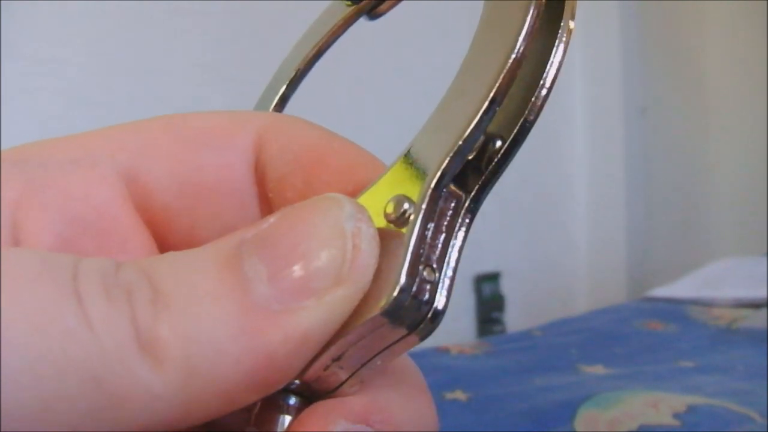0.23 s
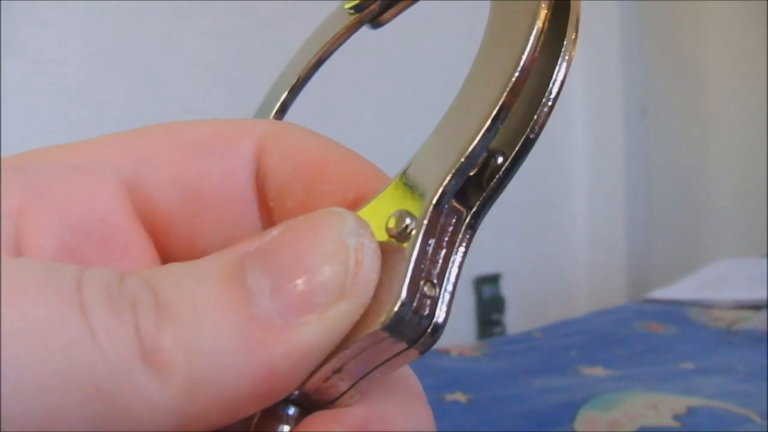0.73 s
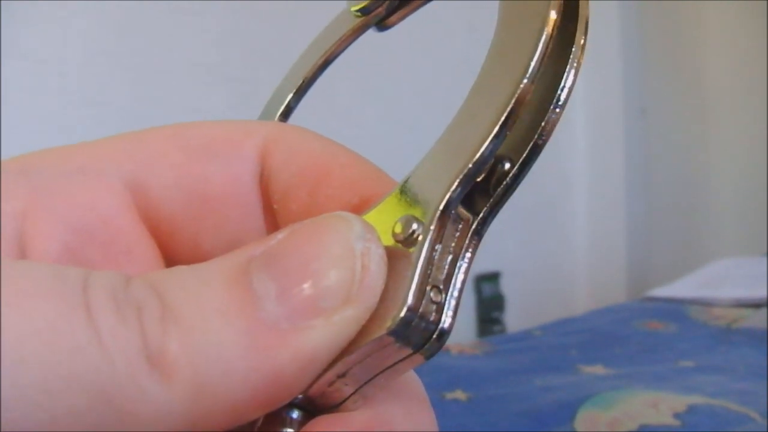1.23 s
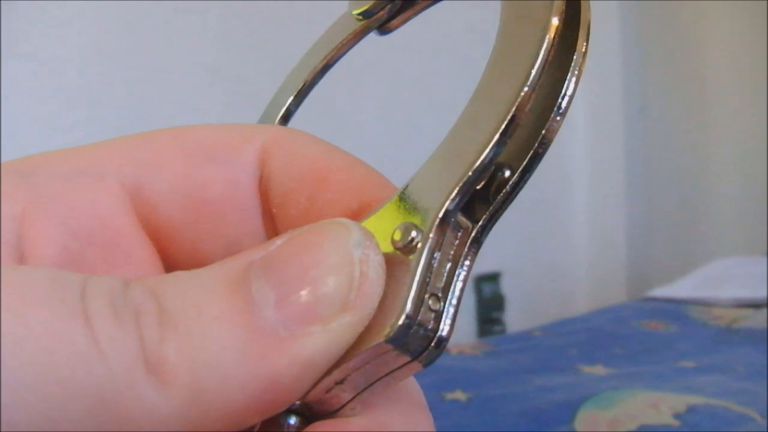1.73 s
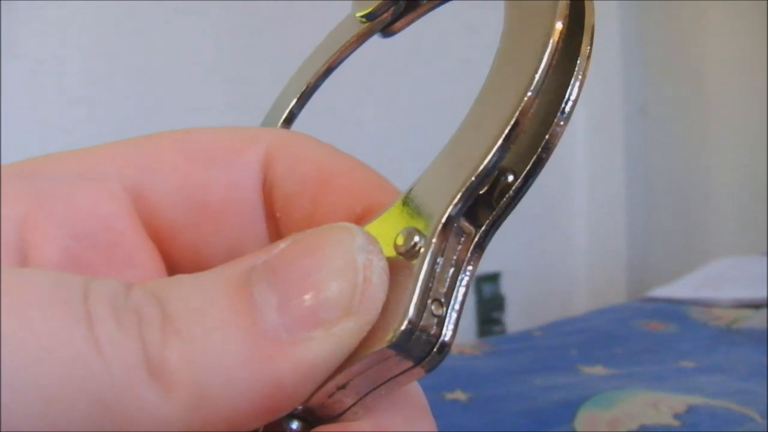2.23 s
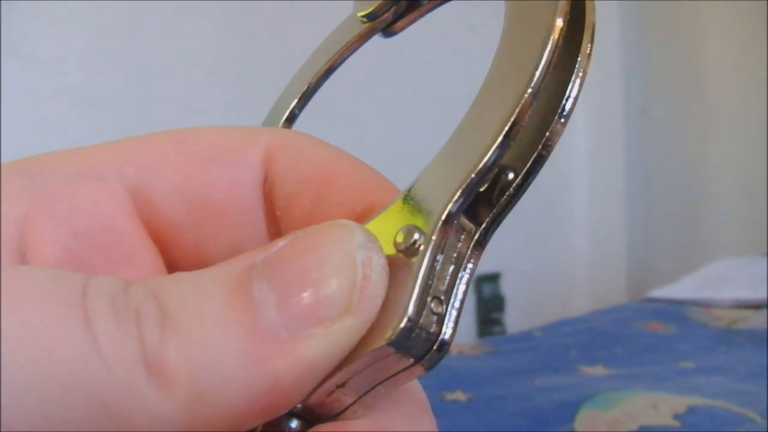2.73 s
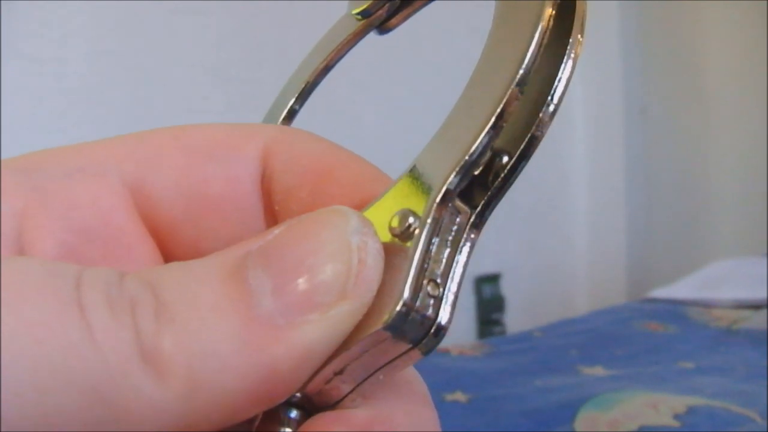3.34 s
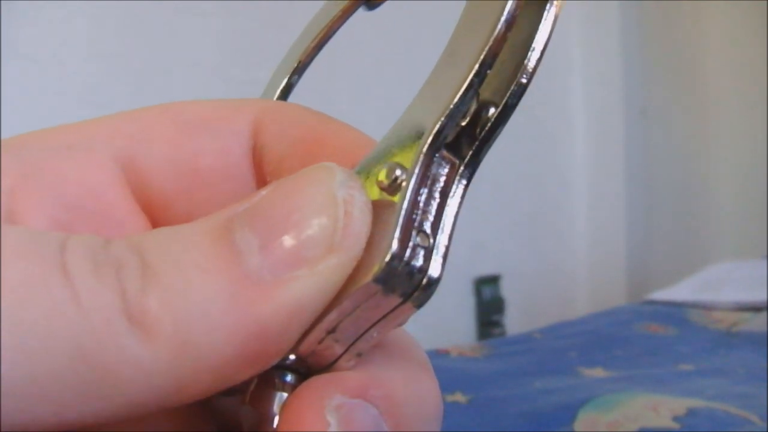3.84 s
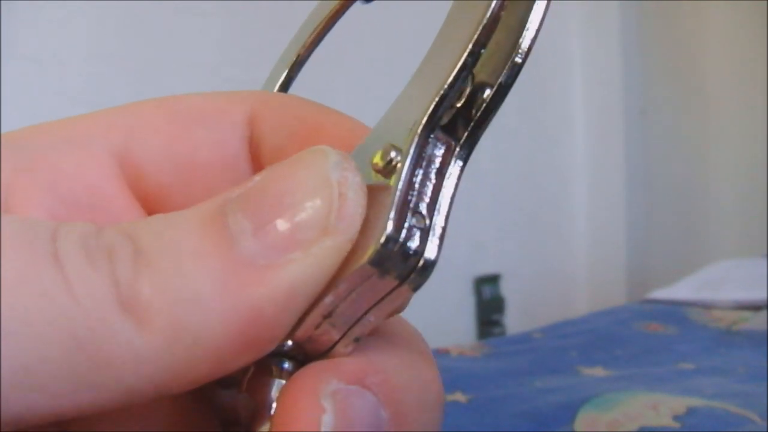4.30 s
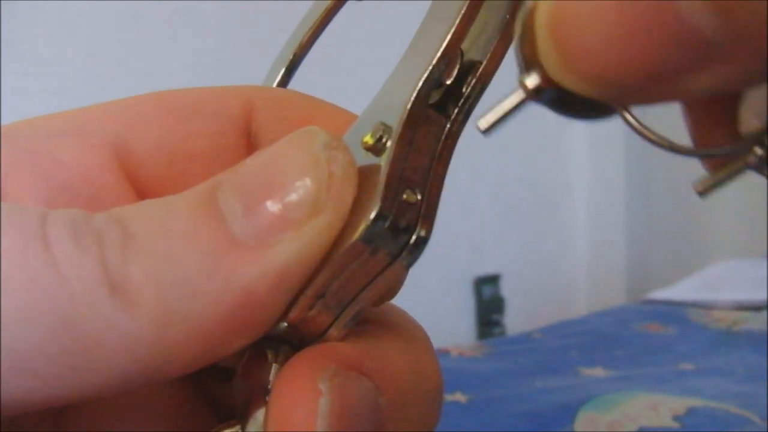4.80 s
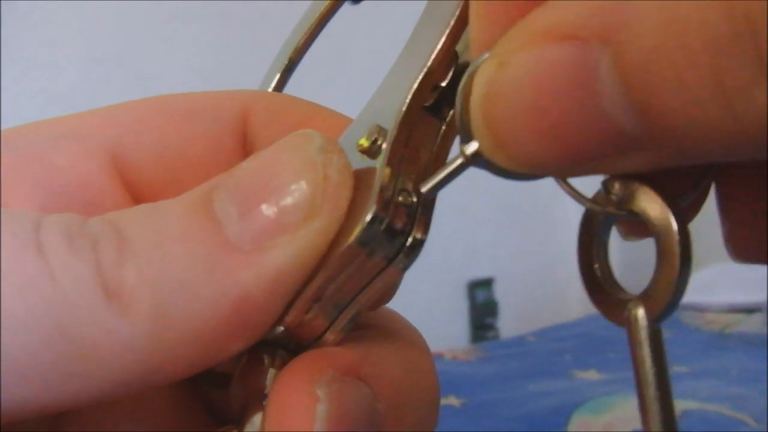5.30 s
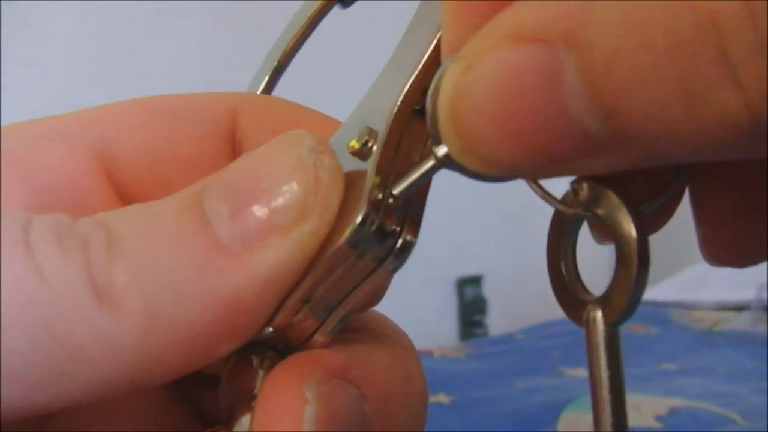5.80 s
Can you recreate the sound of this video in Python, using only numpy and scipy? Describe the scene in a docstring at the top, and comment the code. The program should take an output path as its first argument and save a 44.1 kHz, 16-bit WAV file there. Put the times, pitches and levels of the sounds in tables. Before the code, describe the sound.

Faint, high metallic clinks of keys on a ring and soft handling, followed by a dull knock and light taps on a handcuff lock.

```python
"""A quiet furnished room, a stereo microphone close to the hands, over low rumble and hiss.
A small key on a key ring is picked up and brought to a steel handcuff. Keys and ring clink with two
high tones until a finger or other metal damps them, and scrape on each other between clinks.
The hands bump and rub, skin squeaks once on the steel, and the key knocks on the tightly held lock,
then taps lightly as it feels for the keyhole."""
import sys
import numpy as np
from scipy import signal
from scipy.fft import rfft, irfft
from scipy.io import wavfile
from scipy.ndimage import uniform_filter1d

SR = 44100
rng = np.random.default_rng(int(sys.argv[2]) if len(sys.argv) > 2 else 0)


def digitize_waveform(pressure):
    """Quantize a signal to 16-bit integers and store it at the path in sys.argv[1].

    Rows of a 2-D input are taken as channels; values are limited to [-1, 1].
    """
    field = np.atleast_2d(pressure).T
    bounded = np.clip(field, -1, 1)
    quanta = np.round(bounded * 32767).astype(np.int16)
    wavfile.write(sys.argv[1], SR, quanta)


N = 266893
TIME = np.arange(N) / SR
HZ = np.fft.rfftfreq(N, 1 / SR)

# Keys sliding on the ring. Each row: start and end in seconds, relative level in dB.
KEY_SCRAPES = [(0.517, 0.556, -73), (0.763, 0.96, -57.5), (1.38, 1.446, -57), (1.48, 1.6, -64),
               (2.009, 2.071, -66.5), (2.168, 2.257, -65.5), (2.295, 2.375, -61), (2.39, 2.55, -72),
               (2.734, 2.833, -71), (3.202, 3.31, -74.5), (3.411, 3.567, -67.5), (3.615, 3.85, -71),
               (3.919, 4.113, -67), (5.063, 5.108, -66)]


def amp(db):
    """Decibels to gain."""
    return 10 ** (np.asarray(db) / 20)


def unit_rms(x):
    """Scales to rms 1."""
    return x / np.sqrt(np.mean(x ** 2) + 1e-20)


def curve_at(points, hz):
    """Reads a curve on a log-frequency axis."""
    point_hz, value = np.transpose(points)
    return np.interp(np.log(hz + 1), np.log(point_hz + 1), value)


def filtered(x, response):
    """Applies a frequency response."""
    return irfft(rfft(x) * response, N)


def coloured(clicks, spectrum):
    """Gives clicks a spectrum with minimum phase, so nothing sounds before the blow."""
    log_gain = np.log(amp(curve_at(spectrum, abs(np.fft.fftfreq(2048, 1 / SR)))))
    impulse = np.fft.ifft(np.exp(np.conj(signal.hilbert(log_gain)))).real[:512]
    return signal.oaconvolve(clicks, impulse)[:N]


def resonances(peaks):
    """Frequency response of a body: the direct sound plus its resonances."""
    return 1 + sum(amp(db) / (1 + 2j * (HZ - hz) / width) for hz, width, db in peaks)


def add(mix, start_s, sound):
    """Mixes a sound in at a time."""
    part = mix[max(round(start_s * SR), 0):][:len(sound)]
    part += sound[:len(part)]


def swells(rubs, ends_db=-13):
    """Gain over time of rubs that each swell and fade, their ends weaker than their middle."""
    return sum(amp(db + ends_db * (2 * (TIME - middle) / length) ** 2) for middle, length, db in rubs)


def room_tone(left_db=-53, right_db=-54.1, whine_hz=10900, whine_db=-80):
    """Room rumble and microphone hiss, with a thin electronic whine."""
    # Rumble falling away into hiss. Each row: frequency in Hz, relative density in dB.
    spectrum = [(12, -43), (20, 1), (53, 0.5), (86, -1), (158, -2.5), (234, -5), (270, -5.5), (357, -7.5),
                (1030, -14), (1150, -15), (2260, -19), (5530, -24), (7730, -27), (10500, -30),
                (16000, -36.5)]
    # How alike the two channels are. Each row: frequency in Hz, coherence from 0 to 1.
    likeness = [(30, 0.56), (130, 0.43), (600, 0.28), (3000, 0.35), (15000, 0.1)]
    left, independent = rfft(rng.standard_normal((2, N)))
    coherence = np.clip(curve_at(likeness, HZ), 0, 1)
    right = coherence * left + np.sqrt(1 - coherence ** 2) * independent
    noise = unit_rms(irfft(np.array([left, right]) * amp(curve_at(spectrum, HZ)), N))
    whine = np.sqrt(2) * amp(whine_db) * np.sin(2 * np.pi * whine_hz * TIME)
    return noise * amp([[left_db], [right_db]]) + whine


def slips(grains_per_s=600, spread_db=2.2, clump_db=4, ripple_db=3, port_db=3):
    """Metal slips on metal in clumps of tiny grains, at four contacts with a colour each."""
    spectrum = np.zeros((2, len(HZ)), complex)
    knots_hz = np.linspace(0, SR / 2, num=32)
    for _ in range(4):
        sizes = amp(spread_db * np.minimum(rng.exponential(1, N), 3)) * rng.standard_normal(N)
        drift = unit_rms(uniform_filter1d(rng.standard_normal(N), size=300))
        clumps = amp(clump_db * np.clip(drift, -2, 2))
        grains = sizes * clumps * (rng.random(N) < grains_per_s / SR)
        colour_db = ripple_db * rng.uniform(-2, 2, len(knots_hz))
        # short waves are shaded differently on their way to each microphone port
        shade_db = port_db * rng.uniform(-2, 2, (2, len(knots_hz)))
        spectrum += rfft(grains) * amp([np.interp(HZ, knots_hz, colour_db + side) for side in shade_db])
    return unit_rms(irfft(spectrum, N))


def scrapes(gain_db=3, body_db=-1, body_below_hz=9800, sag_db=4.5, fade_s=0.014):
    """Slips excite the keys along the ring: a high fizz over a lower body, sagging as force is lost."""
    # Colour of sliding metal. Each row: frequency in Hz, relative density in dB.
    colour = [(500, -20), (1500, -17.5), (2300, 3.5), (4000, 2), (5600, -2.5), (6700, 12.5), (8300, 12.5),
              (9500, 5), (11500, 4), (14000, 7.5), (15600, 7), (16300, -11)]
    # Key resonances that a scrape keeps alive. Each row: centre and width in Hz, gain in dB.
    key_peaks = [(7720, 170, 5.5), (10700, 99, 12.5)]
    start, end, db = np.transpose(KEY_SCRAPES)[:, :, None]
    t = TIME[::64]
    progress = np.clip((t - start) / (end - start), 0, 1)
    fades = np.clip(np.minimum(t - start, end - t) / fade_s + .5, 0, 1)
    strokes = amp(db - sag_db * progress) * fades
    force = np.interp(TIME, t, strokes.sum(0))
    body = 1 / (1 + (HZ / body_below_hz) ** 12)
    shelf = 1 - body + amp(body_db) * body
    response = shelf * amp(curve_at(colour, HZ)) * resonances(key_peaks)
    return amp(gain_db) * filtered(force * slips(), response)


def touches(per_s=16, at_most=12, spread_db=3, free_s=0.023, balance_spread_db=8):
    """Rows of faint clinks that come by chance while the keys slide, following each scrape's level."""
    over_scrape_db = np.array([4.5, -1.5, 4, 4])  # bright tick, dull tick, high tone, low tone
    rows = []
    for start, end, db in KEY_SCRAPES:
        times = start + (np.arange(at_most) + rng.random(at_most)) / per_s
        levels = db + over_scrape_db + spread_db * rng.standard_normal((at_most, 4))
        sides = balance_spread_db * rng.standard_normal(at_most)
        rows += [(s, *level, free_s, side) for s, level, side in zip(times, levels, sides) if s < end]
    return rows


def contact_force(t, chatter_s=0.0056, chatter_db=-1, slip_s=0.013, slip_db=-7):
    """Hard contact: one crack, dying micro-bounces and a faint slip that outlasts them."""
    crack = t == 0
    bounces = rng.standard_normal(len(t)) * rng.exponential(1, len(t)) * np.exp(-t / chatter_s)
    bounces *= amp(chatter_db) / np.linalg.norm(bounces)
    slip = rng.standard_normal(len(t)) * np.exp(-t / slip_s)
    slip *= amp(slip_db) / np.linalg.norm(slip)
    return (crack + bounces + slip) * np.sqrt(.004 * SR)


def clinks(gain_db=3, high_gain_db=3.5, damped_t60_s=0.036, pinched_s=0.018, detune=0.00052):
    """Each clink is a tick and the modes of the keys, which ring freely until something touches them."""
    # Clear clinks. Each row: start in seconds, relative levels in dB of bright tick, dull tick,
    # high tone and low tone, seconds until damped, left over right in dB for the high tone.
    strikes = [(0.645, -49, -53.5, -34, -37.5, 0.0073, -3), (0.7725, -41, -61, -48, -39, .01, -4),
               (0.778, -41.5, -62, -38, -46, 0.031, -11), (0.8027, -39.5, -49, -34, -46, 0.052, -15),
               (0.886, -49, -71, -50, -48, .022, 2), (0.9416, -47, -56, -59, -57, 0.057, -2),
               (1.3839, -55, -58, -42.5, -44, 0.015, 3), (1.3992, -57, -53, -53, -49, 0.0092, -4),
               (1.409, -54, -54, -50, -45, .012, -8), (1.462, -69, -73, -46.5, -46, .2, 0),
               (1.5654, -53, -67, -50, -34.5, .007, -3), (1.5695, -49, -58, -55.5, -49, .17, -1),
               (1.6358, -56, -58, -77, -47, .04, -2), (1.9556, -62, -74, -69, -68, .01, -1),
               (2.035, -55, -65, -47.5, -45.5, 0.039, -6), (2.184, -56, -67, -59, -50, .03, -13),
               (2.3207, -51.5, -55, -65, -45, 0.0083, 5), (2.357, -57, -73, -68, -58, .012, -4),
               (2.3886, -49.5, -56, -58, -57, 0.0054, 0), (2.413, -61, -75, -57.5, -55, .11, -3),
               (2.5073, -37.5, -50, -22, -29.5, 0.0077, -.5), (2.5177, -40, -61, -31, -43, 0.023, 2),
               (2.546, -75, -78, -43, -52, 0.071, 1), (2.7058, -52, -75, -65, -48, .071, 2),
               (3.061, -57.5, -63.5, -58.5, -48.5, .009, -1), (3.515, -52, -53.5, -59, -63, .011, 0),
               (3.535, -62, -54.5, -52.5, -63, 0.048, -3), (3.6335, -54.5, -59, -67, -47, .006, 0),
               (3.6796, -60, -72, -71, -58, .015, -3), (3.9126, -65, -68, -57, -66, 0.096, 13),
               (4.0249, -64, -56, -51.5, -52, 0.033, 5), (4.0737, -46, -48, -43, -45, .006, 15),
               (5.06, -47.5, -49.5, -45.5, -67, 0.033, -5), (5.203, -52, -55.5, -60, -79, .005, -5),
               (5.9788, -76, -56, -79, -77, .005, 1)]
    # Key modes. Each row: frequency in Hz, relative level in dB, T60 in seconds.
    # Two rows for the hanging key and one for the pinched key make the high tone; the rest, the low.
    key_modes = [(10620, 3, 0.47), (5500, -20, .2), (10696, 4.5, .1), (7650, 0.5, 0.11), (7760, -11, 0.14),
                 (12530, -32, 0.101)]
    # Colours of the bright and the dull tick. Each row: frequency in Hz, relative density in dB.
    bright_colour = [(2000, -52), (6000, -18), (7200, 9.5), (8200, 6), (9500, 3.5), (10700, 4.5),
                     (12000, 0.5), (14000, -4), (15200, 0), (16000, -3)]
    dull_colour = [(300, -41), (1400, -4), (2200, 2), (3300, 3), (4500, 2), (6000, 9), (9000, -8),
                   (16000, -13)]
    # Steel cuff resonances in the dull tick. Each row: centre and width in Hz, gain in dB.
    cuff_peaks = [(2310, 153, 2.5), (4600, 330, 3), (5430, 930, 7)]
    t = np.arange(SR // 2) / SR
    bright, dull, left, right = np.zeros((4, N))
    hz, mode_db, t60 = np.transpose(key_modes)[:, :, None]
    attack = 1 - np.exp(-t / 0.00048)  # the contact takes a moment to hand over its energy
    for start, bright_db, dull_db, high_db, low_db, free_s, balance_db in strikes + touches():
        force = contact_force(t)
        add(bright, start, amp(bright_db + gain_db) * force)
        add(dull, start, amp(dull_db + gain_db) * force)
        tuning = 1 + detune * rng.standard_normal(hz.shape)  # the grip shifts the tones a little
        damping = amp(-60 * np.maximum(t - free_s, 0) / damped_t60_s)
        modes = amp(mode_db - 60 * t / t60) * np.sin(2 * np.pi * hz * tuning * t) * attack * damping
        pinched = 1 / (1 + (free_s / pinched_s) ** 2)  # short clinks ring mostly the pinched key
        high_tone = amp(high_db + high_gain_db) * ((1 - pinched) * modes[:2].sum(0) + pinched * modes[2])
        low_tone = amp(low_db + gain_db) * modes[3:].sum(0)
        beam = np.arctan(amp(balance_db))  # a turning key beams short waves at one port or the other
        add(left, start, np.sqrt(2) * np.sin(beam) * high_tone + low_tone)
        add(right, start, np.sqrt(2) * np.cos(beam) * high_tone + low_tone)
    dull_ticks = filtered(coloured(dull, dull_colour), resonances(cuff_peaks))
    return np.array([left, right]) + coloured(bright, bright_colour) + dull_ticks


def knocks(drive_octaves=1.35, contact_cycles=0.33):
    """The hand-damped lock answers a blow with a dull knock; a harder contact drives higher modes."""
    # Blows of the key. Each row: start in seconds, relative level in dB, best-driven frequency in Hz.
    blows = [(1.5027, -38, 1400), (1.5093, -35.5, 600), (5.4306, -18, 1000), (5.4331, -32, 750),
             (5.4442, -29, 4600)]
    # Modes of the held lock. Each row: frequency in Hz, relative level in dB, T60 in seconds.
    lock_modes = [(432, -11, 0.026), (660, -13, 0.019), (804, -2, 0.014), (1060, -1.5, 0.012),
                  (1800, -5, 0.0073), (2230, -10.5, 0.0082), (4600, -12, 0.0037)]
    t, out = np.arange(SR // 10) / SR, np.zeros(N)
    hz, mode_db, t60 = np.transpose(lock_modes)[:, :, None]
    for start, db, best_hz in blows:
        drive = np.exp(-.5 * (np.log2(hz / best_hz) / drive_octaves) ** 2)
        ring = np.sum(drive * amp(mode_db - 60 * t / t60) * np.sin(2 * np.pi * hz * t), axis=0)
        attack = 1 - np.exp(-t * best_hz / contact_cycles)
        add(out, start, amp(db) * ring * attack)
    return out


def hand_bumps():
    """The hands and the cuff between them bump softly, each bump one low dying tone."""
    # Bumps. Each row: start in seconds, relative level in dB, pitch in Hz, T60 in seconds.
    bumps = [(1.503, -32, 78.5, 0.14), (1.509, -43, 269, 0.1), (1.905, -48, 430, 0.15),
             (2.16, -44.5, 220, 0.058), (2.526, -38, 89, 0.06), (3.002, -46.5, 200, 0.17),
             (5.436, -33, 127, 0.041)]
    t, out = np.arange(SR // 3) / SR, np.zeros(N)
    for start, db, hz, t60 in bumps:
        add(out, start, -amp(db - 60 * t / t60) * np.sin(2 * np.pi * hz * t))
    return out


def finger_rubs(gain_db=-3):
    """Fingers rub on the cuff as they shift their grip: swells of low noise."""
    # Shifts of grip. Each row: middle and length in seconds, relative level in dB.
    shifts = [(1.93, 0.18, -52), (2.2, .17, -57), (3.1, .4, -60.5), (3.26, 0.16, -53), (3.6, .36, -59.5)]
    # Colour of rubbing skin. Each row: frequency in Hz, relative density in dB.
    colour = [(40, -29), (120, -3), (200, 1), (420, -11.5), (700, -14.5), (1500, -30), (5000, -52)]
    friction = unit_rms(filtered(rng.standard_normal(N), amp(curve_at(colour, HZ))))
    return amp(gain_db) * friction * swells(shifts)


def squeak(peak_s=2.005, rise_s=0.0138, fall_s=0.015, low_hz=780, top_hz=1158, db=-48.5, rough=0.3):
    """Skin sticks and slips on the steel in uneven cycles; pitch and level rise and fall together."""
    speed = np.exp(-((TIME - peak_s) / np.where(TIME < peak_s, rise_s, fall_s)) ** 2)
    hz = low_hz + (top_hz - low_hz) * speed
    size_jitter, phase_jitter = unit_rms(uniform_filter1d(rng.standard_normal((2, N)), size=90))
    phase = 2 * np.pi * np.cumsum(hz) / SR + rough * phase_jitter
    tone = unit_rms((1 + rough * size_jitter) * np.sin(phase))
    return np.sqrt(2) * amp(db) * tone * speed ** 0.66


def cuff_slide(centre_hz=2230, width_hz=400):
    """The cuff slides in the fingers: friction noise through one resonance."""
    # Slides. Each row: middle and length in seconds, relative level in dB.
    slides = [(4.04, 0.29, -62.5), (4.37, .15, -66)]
    resonance = 1 / (1 + 2j * (HZ - centre_hz) / width_hz)
    return unit_rms(filtered(rng.standard_normal(N), resonance)) * swells(slides)


def keyhole_taps(hz=1030, t60_s=.034):
    """The key tip feels for the keyhole, each light tap ringing the lock briefly at one pitch."""
    # Taps. Each row: start in seconds, relative level in dB.
    taps = [(5.722, -50), (5.813, -48.5), (5.983, -44)]
    t, out = np.arange(SR // 10) / SR, np.zeros(N)
    for start, db in taps:
        add(out, start, amp(db - 60 * t / t60_s) * np.sin(2 * np.pi * hz * t))
    return out


def room_tail(x, t60_s=0.21):
    """A small furnished room: a short tail of reflections, different at each microphone port."""
    t = np.arange(SR // 3) / SR
    reflections = rng.standard_normal((2, len(t))) * (rng.random((2, len(t))) < .1)
    reflections *= (t > .003) * amp(-60 * t / t60_s)
    reflections /= np.linalg.norm(reflections, axis=1, keepdims=True)
    return signal.fftconvolve(x[None], reflections, axes=1)[:, :N]


def scene(lag_s=.000088, keys_room_db=-15, held_room_db=-21):
    """Keys hang to the right and reach the left port later; lock and hands are just left of centre."""
    keys = clinks() + scrapes()
    held = knocks() + hand_bumps() + finger_rubs() + squeak() + cuff_slide() + keyhole_taps()
    # Shading of the keys at the microphone. Each row: frequency in Hz, left gain and right loss in dB.
    shade = [(2000, 0.57), (5000, -0.55), (7600, 0.39), (10600, -0.73), (14000, 0)]
    tilt = amp(curve_at(shade, HZ))
    delay = np.exp(-2j * np.pi * HZ * lag_s)
    direct = filtered(keys, np.array([tilt * delay, 1 / tilt])) + held * amp([[1], [-1]])
    tail = room_tail(amp(keys_room_db) * keys.mean(0) + amp(held_room_db) * held)
    return direct + tail + room_tone()


def record(dry, threshold_db=-42, slope=0.17, recovery_db_per_s=28, cutoff_hz=16200):
    """Gain control ducks everything a little after loud contacts; a low-pass limits the band."""
    power = signal.lfilter([.002], [1, -.998], (dry ** 2).mean(0))
    level_db = 10 * np.log10(power + 1e-12)
    recovery_db = TIME * recovery_db_per_s
    held_db = np.maximum.accumulate(level_db + recovery_db) - recovery_db
    over_db = np.maximum(held_db - threshold_db, 0)
    ducked = dry * amp(-slope * signal.lfilter([.001], [1, -.999], over_db))
    lowpass = signal.firwin(255, cutoff_hz, window=("kaiser", 8), fs=SR)
    return signal.oaconvolve(ducked, lowpass[None], "same")


dry = scene()
out = record(dry)
digitize_waveform(out)
```